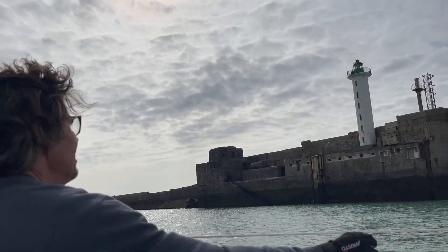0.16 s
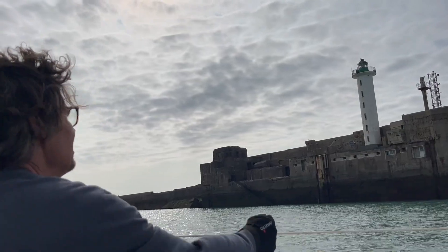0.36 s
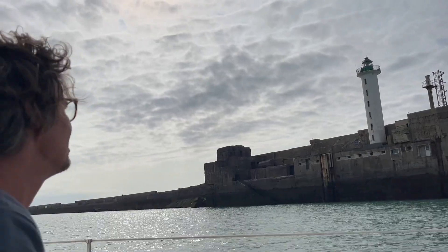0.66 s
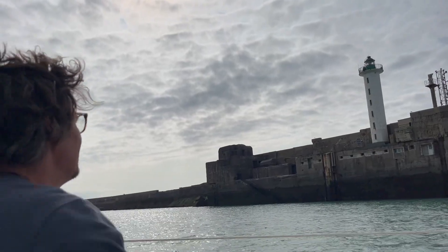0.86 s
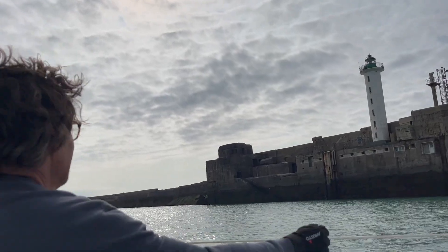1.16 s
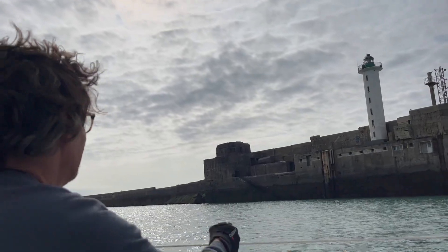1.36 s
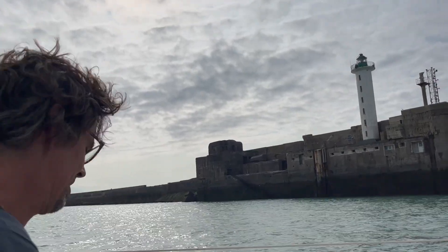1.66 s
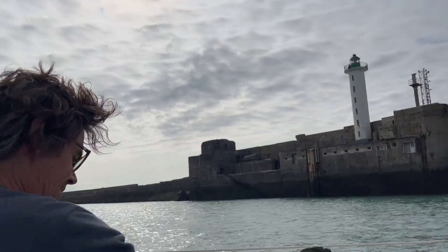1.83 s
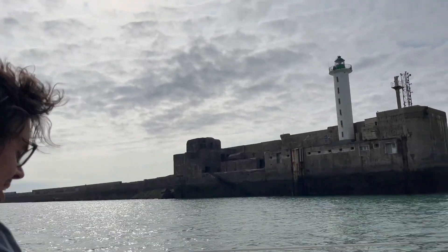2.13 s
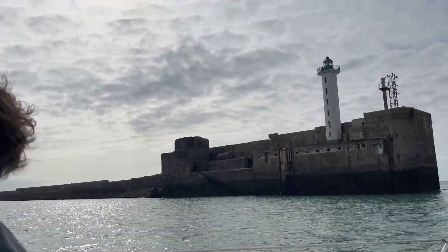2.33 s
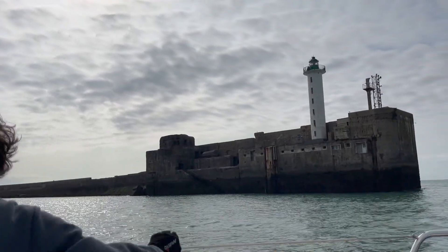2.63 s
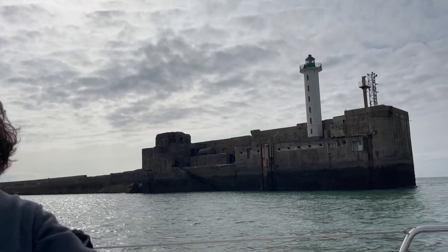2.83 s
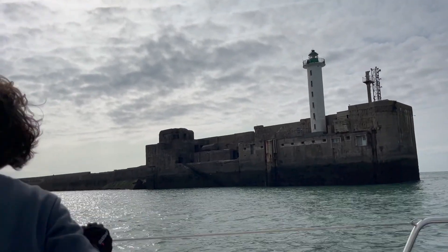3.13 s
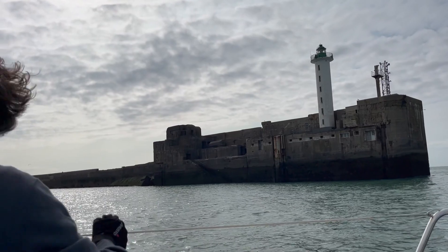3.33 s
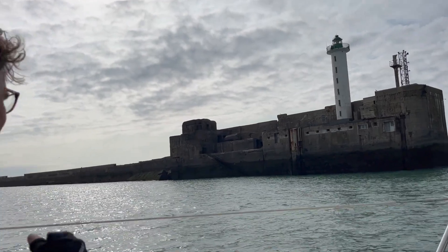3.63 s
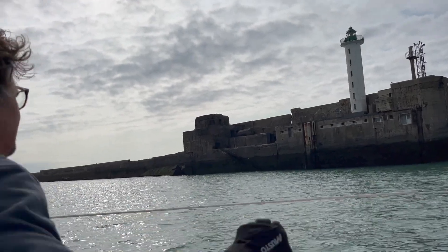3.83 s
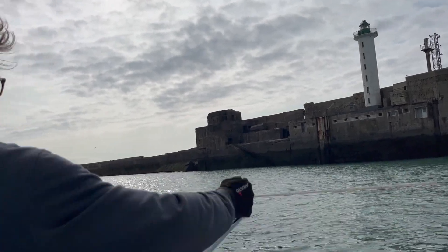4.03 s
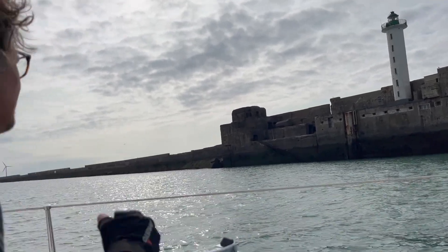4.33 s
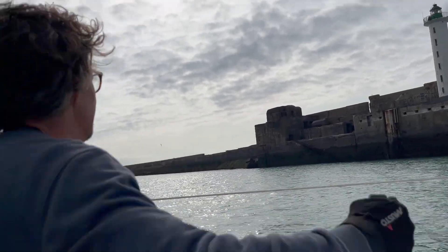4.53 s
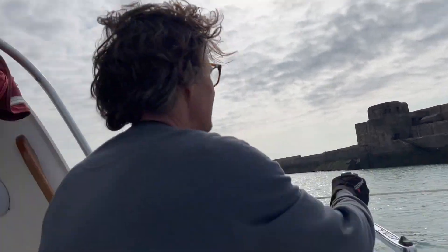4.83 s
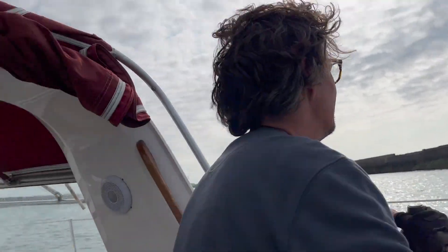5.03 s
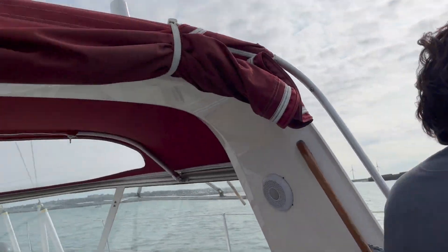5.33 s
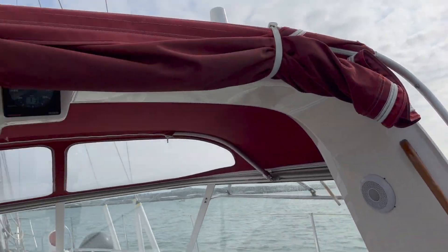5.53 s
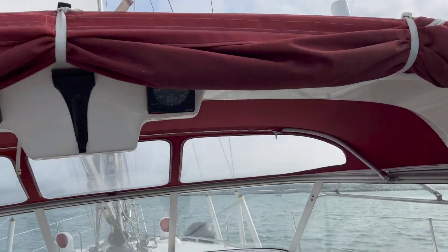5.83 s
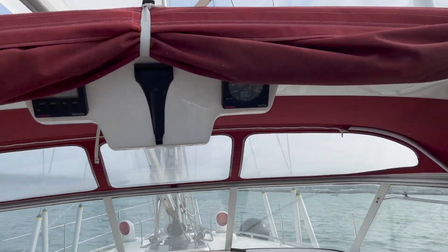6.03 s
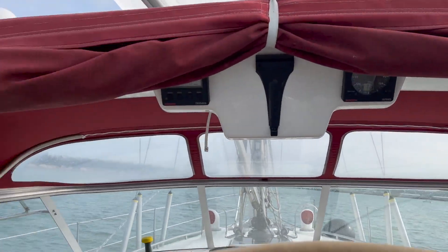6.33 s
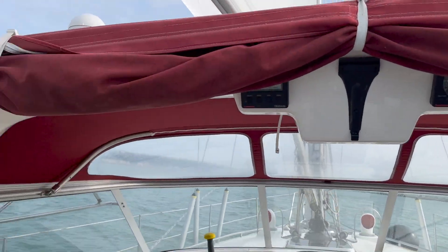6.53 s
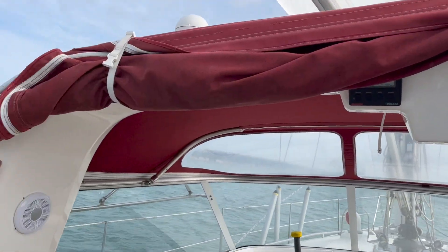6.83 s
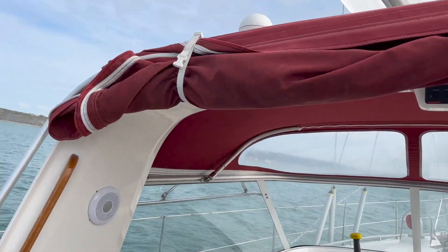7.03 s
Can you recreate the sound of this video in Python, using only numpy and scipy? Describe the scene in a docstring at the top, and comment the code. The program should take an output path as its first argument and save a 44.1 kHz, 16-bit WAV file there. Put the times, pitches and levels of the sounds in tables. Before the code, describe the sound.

Close steel ratchet clicking and gear grinding as a sailor cranks a winch, with buffeting wind, then the clatter grows fainter off to the side.

```python
"""Sheet winch in a yacht's cockpit

A sailor cranks a sheet winch at close range, pausing once; the microphone then turns away to the side.
Steel pawls are noise blows that excite ringing modes; filtered noise makes the grinding, chattering gears.
Resonant blows make knocks under load and single ticks; low decaying modes thud in the deck.
Shaped noise buffets the two microphone ports as wind, over a faint wash of water."""
import sys
import numpy as np
from scipy import signal
from scipy.fft import rfft, irfft, next_fast_len
from scipy.io import wavfile
from scipy.ndimage import uniform_filter1d

SR = 44100
rng = np.random.default_rng(int(sys.argv[2]) if len(sys.argv) > 2 else 0)


def waveform_to_disk(signal):
    """Save audio, clipped to [-1, 1], as 16-bit WAV at the path in sys.argv[1]."""
    frames = np.transpose(np.atleast_2d(signal))
    scaled = np.clip(frames, -1, 1) * 32767
    samples = np.round(scaled).astype(np.int16)
    wavfile.write(sys.argv[1], SR, samples)


N = 316682
T = np.arange(N) / SR
HIT = T[:SR // 14]  # time within one blow, s

# Levels in the tables are relative: each function adds its own trims.
# pushes of the handle: t/s, teeth, rate at start/(teeth/s), rate at end/(teeth/s),
# extra rate mid-push/(teeth/s), level/dB
STROKES = [(0.0116, 10, 32.18, 31.57, -5.63, -34.5), (0.3637, 14, 33.68, 37.9, 2.1, -34),
           (0.7575, 11, 20.94, 14.2, 8.85, -35.5), (1.2804, 18, 22.82, 42.24, 11.07, -36.5),
           (1.7553, 23, 34.52, 42.08, 8.98, -35), (2.2804, 11, 33.61, 28.49, -1.86, -36),
           (2.652, 5, 24.95, 17.26, 3.88, -34.5), (3.4745, 10, 29.94, 27.63, 3.27, -36.5),
           (3.8056, 13, 32.95, 50.38, 0.53, -34.5), (4.118, 11, 39.47, 31.85, 1.6, -34),
           (4.4362, 21, 28.84, 33.05, 9.6, -34), (5.0089, 10, 28.58, 32.87, -0.94, -39),
           (5.3327, 11, 37.61, 48.78, 5.39, -38.5)]
# cranking goes on off to the side: t/s, rate/(teeth/s), level/dB
TURNED_AWAY = [(5.57, 51, -42.5), (5.7, 35, -46.5), (5.9, 32.4, -50.5), (6.15, 33.6, -41.5),
               (6.6, 38, -48.5), (7.18, 54.4, -48.5)]
# grinding of the gear train: t/s, level/dB
GEARS = [(0, -46), (.6, -40), (.85, -46.5), (1.3, -48), (1.5, -37.5), (2.2, -43), (2.5, -51), (2.8, -47.5),
         (2.9, -60), (3.38, -66), (3.5, -42.5), (4.9, -41.5), (5.1, -48), (7.18, -50.5)]
# knocks of metal under load, and ticks of the second pawl that stand out singly: t/s, level/dB, f/Hz
KNOCKS_AND_TICKS = [(0.214, -29, 4270), (0.325, -27, 3750), (0.483, -26, 2880), (0.595, -25.5, 2770),
                    (.652, -29, 3350), (.676, -32, 3330), (0.756, -27, 3000), (.954, -35, 3550),
                    (0.99, -32, 3730), (1.027, -33.5, 3700), (1.064, -32.5, 3500), (1.105, -32.5, 3800),
                    (1.157, -21.5, 4000), (1.355, -32, 3570), (1.384, -31.5, 3440), (1.478, -22.5, 4700),
                    (1.74, -24.5, 2820), (1.923, -26.5, 4000), (2.143, -31.5, 3620), (2.604, -31.5, 3520),
                    (3.02, -27.5, 1274), (3.397, -34.5, 1470), (3.433, -39, 3600), (3.46, -40, 3420),
                    (3.495, -31, 2930), (3.873, -26, 2440), (4.021, -27, 2380), (4.169, -26.5, 4140),
                    (4.226, -31, 2700), (4.48, -30, 4440), (4.618, -25.5, 3060), (4.785, -22.5, 2580),
                    (4.927, -38.5, 4040), (5.008, -21.5, 5400), (5.778, -38, 2670), (6.084, -34.5, 2520),
                    (6.304, -36.5, 2570), (6.548, -38, 2500), (6.787, -39.5, 2601), (7.109, -37, 2740)]
# spectrum of knocks, rasp and gear chatter: f/Hz, density/(dB per Hz)
CLACK_COLOUR = [(400, -4.5), (1700, 11), (2700, 15), (5000, 5), (7000, 9.5), (9500, -1), (16000, -24)]
# spectrum of small eddies on the ports: f/Hz, density/(dB per Hz)
FLUTTER = [(50, -34), (150, -6), (330, -1), (500, 2.5), (800, -3), (1200, -15.5), (1900, -27), (5000, -90)]


def undb(db):
    """Decibels to gain."""
    return 10 ** (np.asarray(db) / 20)


def unit(x):
    """Scale to rms 1."""
    return x / np.sqrt(np.mean(x ** 2))


def strongest_rms(x, size):
    """Rms of the loudest stretch of size samples, both ports together."""
    power = np.atleast_2d(x).mean(0) ** 2
    return np.sqrt(uniform_filter1d(power, size, mode="constant").max())


def loudest(x, size):
    """Scale so that the loudest stretch of size samples has rms 1 in the mean of the ports."""
    return x / strongest_rms(x, size)


def smooth(x, size):
    """Running mean over size samples, taken twice."""
    return uniform_filter1d(uniform_filter1d(x, size), size)


def curves(table):
    """The columns of a table, joined by straight lines in time."""
    s, *columns = np.transpose(table)
    return [np.interp(T, s, column) for column in columns]


def colour(x, points):
    """Causal minimum-phase filter with the given spectrum, at unit power gain."""
    size = 4096
    hz, db = np.transpose(points)
    log_hz = np.log(np.fft.rfftfreq(size, 1 / SR) + 1)
    log_gain = np.log(undb(np.interp(log_hz, np.log(hz), db)))
    # folding the cepstrum forward in time makes the response causal
    cepstrum = irfft(log_gain)[:size // 2]
    cepstrum[1:] *= 2
    response = irfft(np.exp(rfft(cepstrum, size)))
    response /= np.linalg.norm(response)
    return signal.oaconvolve(x, response[None], axes=1)[:, :N]


def noise(count, side):
    """Stereo noise; side is the weight of what differs between the ports."""
    common, apart = rng.standard_normal((2, count))
    return np.array([common + side * apart, common - side * apart])


def add(out, s, x):
    """Mix x in at time s."""
    i = int(np.clip(s * SR, 0, N - 1))
    out[:, i:i + x.shape[-1]] += x[..., :N - i]


def resonate(x, hz, q):
    """One resonance of sharpness q."""
    return signal.lfilter(*signal.iirpeak(min(hz, .4 * SR), max(q, 1), fs=SR), x)


def knock(push, hz, q):
    """A blow with a pitch: two resonances in series, the second set to half the sharpness."""
    return loudest(resonate(resonate(push, hz, q), hz, q / 2), size=88)


def contact(rise_s, decay_s, tail_db, tail_s):
    """Envelope of a blow: brief chatter, then reflections in the cockpit."""
    fall = np.exp(-HIT / decay_s) + undb(tail_db) * np.exp(-HIT / tail_s)
    return (1 - np.exp(-HIT / rise_s)) * fall


def eddies(points, side, size):
    """Turbulence of even strength over spans of size samples, ragged within them."""
    x = colour(noise(N, side), points)
    return x / np.sqrt(smooth(np.mean(x ** 2, axis=0), size))


def puffs(breeze_db, rumble_db=-3, flutter_db=-8, half_s=0.018, count=24):
    """Lesser gusts come by chance, about three a second, with strengths scattered about the breeze."""
    times = (np.arange(count) + rng.random(count)) * T[-1] / count
    spread_db = 3
    sizes = np.interp(times, T, breeze_db) + spread_db * np.tanh(rng.standard_normal(count))
    return [(s, db + rumble_db, db + flutter_db, half_s) for s, db in zip(times, sizes)]


def wind(rumble_db=-0.38, flutter_db=-1.5, calm_flutter_db=-12, ragged_db=5.0, lean_db=1.5, spray_db=4):
    """Large eddies rumble on both ports, small ones flutter on each; a gust drives both at once."""
    # the air flowing over the microphone: t/s, rumble/dB
    breeze = [(0.0, -32.5), (1.3, -33), (1.7, -26.5), (2.44, -31), (2.95, -20.5), (3.15, -43.5),
              (3.45, -27), (3.9, -29), (4.1, -40.5), (4.5, -29), (4.75, -39.5), (5.1, -42.5), (5.7, -36.5),
              (6.1, -33.5), (6.6, -26.5), (7.18, -35)]
    # the strongest gusts: t/s, rumble/dB, flutter/dB, half length/s
    gusts = [(0.045, -16, -27, 0.015), (1.005, -22, -56, 0.023), (1.435, -20, -30, 0.044),
             (1.622, -15.5, -20, 0.0096), (1.742, -9.5, -25, 0.022), (1.854, -14.5, -30, 0.018),
             (2.104, -15.5, -27, 0.019), (2.203, -20, -23, 0.028), (2.296, -10, -20.5, 0.027),
             (2.522, -15.5, -22.5, 0.017), (2.597, -25, -23, 0.035), (2.711, -20.5, -27, 0.01),
             (2.8, -22, -25.5, 0.014), (2.841, -16, -20, 0.014), (2.946, -31, -26.5, 0.028),
             (3.231, -17.5, -18.5, 0.013), (3.276, -17.5, -22.5, 0.031), (3.724, -30, -27, 0.019),
             (3.84, -24, -29.5, .012), (3.921, -19.5, -23, 0.037), (4.327, -23, -27, 0.018),
             (4.597, -21.5, -22.5, .023), (5.249, -21.5, -41, 0.012), (5.408, -28.5, -39, 0.096),
             (5.795, -37, -34.5, 0.029), (6.019, -19, -32.5, 0.028), (6.47, -26, -25.5, 0.023),
             (7.072, -24, -26.5, 0.056)]
    # spectrum of large eddies: f/Hz, density/(dB per Hz)
    rumble_colour = [(20, -31), (45, -6.5), (72, 3), (130, -4.5), (300, -10.5), (450, -17), (1500, -76)]
    breeze_db, = curves(breeze)
    breeze_ragged_db = 3
    slow = unit(smooth(rng.standard_normal(N), 1300))
    quick = unit(smooth(rng.standard_normal(N), 420))
    # powers of the large and the small eddies
    low = undb(breeze_db + breeze_ragged_db * np.tanh(slow)) ** 2
    high = low * undb(calm_flutter_db) ** 2
    for s, low_db, high_db, half in gusts + puffs(breeze_db):
        near = np.abs(T - s) < 4 * half
        swell = np.exp(-((T[near] - s) / half) ** 2)
        low[near] += swell * undb(low_db) ** 2
        high[near] += swell * undb(high_db) ** 2
    rumble = eddies(rumble_colour, side=1 / 10, size=800) * np.sqrt(low)
    rumble *= undb(rumble_db + .5 * ragged_db * quick)
    flutter = eddies(FLUTTER, side=0.7, size=450) * np.sqrt(high)
    flutter *= undb(flutter_db + ragged_db * quick)
    # the hardest gusts tear into finer, higher eddies: these grow with power, not amplitude
    finer = [(1.19 * hz, db) for hz, db in FLUTTER]
    flutter += eddies(finer, side=0.36, size=450) * high * undb(spray_db + ragged_db * quick)
    # once the microphone has turned, the left port is to windward
    lean = lean_db + np.interp(T, [5.5, 6.1], [0, 2.5])
    return (rumble + flutter) * undb(np.array([lean, -lean]) / 2)


def water(level_db=-49):
    """The wash along the hull: coloured noise that swells slowly."""
    # spectrum of the wash: f/Hz, density/(dB per Hz)
    wash = [(100, -4), (700, -1), (2000, -22.5), (5000, -27), (16000, -60)]
    swell_db = np.interp(T, np.arange(32) / 4, rng.standard_normal(32))
    return unit(colour(noise(N, side=1.0), wash)) * undb(level_db + swell_db)


def gears(grind_db=-5.0, chatter_db=-8.0, grain_s=0.0039, whirr_db=7, housing_db=-51):
    """Bearings grind steadily; gear teeth tick at random moments as they change flanks."""
    # spectrum of the bearings: f/Hz, density/(dB per Hz)
    grind_colour = [(300, -6), (900, 14.5), (1900, 6), (3600, -0.5), (5200, -3.5), (6600, -14.5), (9000, 2),
                    (12500, -37)]
    # the winch housing heard from the side: f/Hz, density/(dB per Hz)
    housing_colour = [(900, -10.5), (1620, 8.5), (1850, -28), (2450, -30), (3300, 1.5), (12000, -36)]
    db, = curves(GEARS)
    rate, spread_db = 55, 4  # mean impacts per second; dB per unit of the random draw
    struck = rng.random(N) < rate / SR
    impacts = struck * undb(spread_db * np.minimum(rng.exponential(size=N), 2))
    envelope = signal.lfilter([1], [1, -np.exp(-1 / (grain_s * SR))], impacts)
    chatter = unit(colour(noise(N, side=0.2) * envelope, CLACK_COLOUR)) * undb(chatter_db)
    # from the side, more of the winch arrives as a diffuse whirr with the hollow note of its housing
    whirr = whirr_db * np.interp(T, [5.1, 6.1], [0, 1])
    grind = unit(colour(noise(N, side=0.54), grind_colour)) * undb(grind_db + whirr)
    housing = unit(colour(noise(N, side=1.0), housing_colour)) * undb(housing_db)
    housing *= np.interp(T, [4.8, 5.8], [0, 1])
    return (chatter + grind) * undb(db) + housing


def tooth_times(s, teeth, first, last, swell):
    """A push sweeps between two paces, with extra mid-push; gives tooth times and the pace between them."""
    along = np.linspace(0, 1, round(teeth) - 1)
    rate = first + (last - first) * along + swell * np.sin(np.pi * along)
    return s + np.r_[0, np.cumsum(1 / rate)], rate


def stroke_teeth(scatter_db=3.0):
    """One pawl drop for each tooth of each push."""
    drops = []
    for s, teeth, first, last, swell, db in STROKES:
        times, _ = tooth_times(s, teeth, first, last, swell)
        drops += zip(times, db + scatter_db * np.tanh(rng.standard_normal(len(times))))
    return drops


def later_teeth(uneven=0.15, scatter_db=2):
    """Off to the side, one drop for each tooth that passes, at the pace of the arm."""
    rate, db = curves(TURNED_AWAY)
    late, size = rng.standard_normal((N // 441, 2)).T
    started = T > TURNED_AWAY[0][0]
    teeth_passed = np.cumsum(rate * started) / SR
    drops = np.flatnonzero(np.diff(np.floor(teeth_passed)))
    return [(T[i] + uneven * a / rate[i], db[i] + scatter_db * b) for i, a, b in zip(drops, late, size)]


def ring(push, dull_db, lift_db, bloom_s=.0009):
    """Steel modes swell briefly, then decay; every blow detunes them and shares out their levels anew."""
    # the steel pawl, ratchet and housing: f/Hz, level/dB, t60/s
    steel = [(1560, -11, .025), (2450, -7, .012), (2800, -7.5, .012), (3540, -7, .03), (3630, -1, 0.045),
             (4030, -4, 0.02), (4680, -10, .01), (5450, -13, .01), (7772, 3.5, 0.032), (8300, -13, 0.01),
             (8740, -2, 0.02), (8850, -2, 0.018), (9170, -10, .012), (14440, -12, 0.018),
             (15282, -11, 0.014)]
    out, main = 0, 0
    spread_db, detune = 4.8, .0028  # scatter of level; scatter of pitch as a fraction
    corner_hz = 2600  # above it, dull_db is lost per octave
    for (hz, db, t60), (a, b) in zip(steel, rng.standard_normal((len(steel), 2))):
        turn = 2 * np.pi * hz * (1 + detune * a) / SR
        ring_keep = np.exp(-np.log(1000) / (t60 * SR))
        bloom_keep = np.exp(-1 / (min(bloom_s, t60 / 20) * SR))
        mode = push
        for keep in ring_keep, bloom_keep:
            mode = signal.lfilter([1], [1, -2 * keep * np.cos(turn), keep ** 2], mode)
        loss_db = dull_db * max(np.log2(hz / corner_hz), 0)
        mode = undb(db + spread_db * b - loss_db) * unit(mode)
        out = out + mode
        main = main + mode * (7000 < hz < 8200 or hz > 14000)  # main ring and its overtones
    strongest = np.sqrt(uniform_filter1d(np.mean(out ** 2, axis=0), size=529, mode="constant").max())
    return (out + (undb(lift_db) - 1) * main) / strongest


def cockpit(x, tail_s=0.025, wet_db=-5):
    """As the microphone turns away, the cockpit walls blend the ringing into a sizzle."""
    turned = np.interp(T, [5.5, 5.8], [0, 1])
    walls = rng.standard_normal(len(HIT)) * np.exp(-HIT / tail_s) * (1 - HIT / HIT[-1])
    spectrum = rfft(walls, 2 * len(HIT))
    walls = irfft(spectrum / np.abs(spectrum))[:len(HIT)]  # many reflections, favouring no pitch
    echo = signal.oaconvolve(x, walls[None], axes=1)[:, :N]
    wet = turned * undb(wet_db)
    return (x + echo * wet) / np.hypot(1, wet)


def ratchet(tick_db=-5.5, tick_spread_db=4.5, ring_db=0, bounce=0.44):
    """Each pawl snaps down, bounces a few milliseconds later and sets the steel ringing."""
    # as the microphone turns, the cockpit favours the main ring near 8 kHz and its overtones: t/s, lift/dB
    facing = [(5.2, 0.5), (5.34, 14.5), (5.55, 1), (6.8, 4)]
    # spectrum of the snap: f/Hz, density/(dB per Hz)
    tick_colour = [(400, 11.5), (1000, 15.5), (1900, 11), (2700, -8), (4800, -2.5), (6700, 6), (9200, 5.5),
                   (11500, 2), (15300, 1), (16200, -44)]
    snaps, rings = np.zeros((2, 2, N))
    blow = contact(rise_s=0.00049, decay_s=0.0025, tail_db=-18.0, tail_s=0.007)
    bounce_s = .003, .011  # earliest and latest
    for s, db in stroke_teeth() + later_teeth():
        rebound = np.interp(HIT - rng.uniform(*bounce_s), HIT, blow, left=0)
        envelope = blow + bounce * rng.random() * rebound
        push = loudest(noise(len(HIT), side=0.59) * envelope, size=529)
        snap_db = tick_db + tick_spread_db * np.tanh(rng.standard_normal())
        add(snaps, s, push * undb(db + snap_db))
        dull_db = np.interp(s, [5.6, 6.05], [.5, 2.2])  # the ring is duller from the side
        lift_db = np.interp(s, *np.transpose(facing))
        narrowed = (push + push.mean(0)) / 2
        add(rings, s, undb(db + ring_db) * ring(narrowed, dull_db, lift_db))
    return colour(snaps, tick_colour) + cockpit(rings)


def second_pawl(level_db=4.0, gearing=0.95, scatter_db=5, decay_s=0.00059, pitch_hz=3700, pitched_db=-3):
    """A second pawl, deeper in the gears, ticks dry with random pitch, harder the more the gears grind."""
    # spectrum of the second pawl: f/Hz, density/(dB per Hz)
    dry_tick = [(600, -3), (2300, 0.5), (5500, -5), (8000, 5), (11000, -12), (16000, 0)]
    broad, pitched = np.zeros((2, 2, N))
    blow = contact(rise_s=0.00043, decay_s=decay_s, tail_db=-22.5, tail_s=0.0054)
    spread_octaves, q, clear_s = .6, 2.5, .02
    drops = [s for s, _ in later_teeth(uneven=0.45)]
    for s, teeth, first, last, swell, _ in STROKES:
        times, rate = tooth_times(s, teeth, first, last, swell)
        # during a push it ticks gearing times for each tooth of the first pawl
        places = np.arange(rng.random(), len(rate), 1 / gearing)
        drops += list(np.interp(places, np.arange(len(times)), times))
    for s in drops:
        grind_db = np.interp(s, *np.transpose(GEARS))
        gain = undb(grind_db + level_db + scatter_db * np.tanh(rng.standard_normal()))
        # near a listed knock or tick it stays silent
        gain *= min(abs(s - listed[0]) for listed in KNOCKS_AND_TICKS) > clear_s
        tick = loudest(noise(len(HIT), side=0.31) * blow, size=88)
        hz = pitch_hz * 2 ** (spread_octaves * rng.uniform(-0.7, 1))
        add(broad, s, gain * tick)
        add(pitched, s, gain * undb(pitched_db) * knock(tick, hz, q))
    return colour(broad, dry_tick) + pitched


def knocks_and_ticks(level_db=0, broad_db=-5, q=1.45, rasp_db=-20, turned_rasp_db=13, rasp_s=0.082):
    """Knocks of metal under load and single second-pawl ticks, each with its own pitch and a brief rasp."""
    knocks, rasps, rings = np.zeros((3, 2, N))
    blow = contact(rise_s=0.0004, decay_s=0.0011, tail_db=-9, tail_s=0.005)
    for s, db, hz in KNOCKS_AND_TICKS:
        push = loudest(noise(len(HIT), side=0.26) * blow, size=88)
        edge = min(hz / 2600, 1) ** 4  # low knocks are softer edged
        add(knocks, s, undb(db + broad_db) * edge * push)
        add(rings, s, undb(db + level_db) * knock(push, hz, q / np.sqrt(edge)))
        # from the side, more of the rasp arrives by way of the cockpit walls
        side_db = turned_rasp_db * (s > TURNED_AWAY[0][0])
        fade = np.exp(-HIT / rasp_s) * (1 - HIT / HIT[-1])
        rasp = noise(len(HIT), side=0.61) * fade * edge
        add(rasps, s, undb(db + rasp_db + side_db) * rasp)
    return colour(knocks + rasps, CLACK_COLOUR) + rings


def thuds(rise_s=0.0014, sag=1.6, level_db=-1.5, rough=0.17):
    """The deck under the winch gives a few low cycles of its modes, sagging in pitch, with a woody rattle."""
    # dull thuds in the deck: t/s, level/dB, f/Hz at the start
    thud_events = [(0.603, -20, 319), (.763, -19, 332), (1.163, -16.5, 295), (2.357, -25.5, 640)]
    # the deck's panel modes: multiple of the pitch, level/dB, decay/s
    deck = [(.72, -9, 0.0086), (1, 0, 0.01), (1.36, -4, 0.0034), (2.1, -16.5, 0.0048)]
    out = np.zeros((2, N))
    for s, db, hz in thud_events:
        phase = 2 * np.pi * np.cumsum(hz * np.exp(-sag * HIT)) / SR
        swing = sum(undb(mode_db) * np.sin(k * phase) * np.exp(-HIT / decay) for k, mode_db, decay in deck)
        band = signal.butter(2, [hz / 2, 2 * hz], "bandpass", fs=SR, output="sos")
        rattle = unit(signal.sosfilt(band, rng.standard_normal(len(HIT))))
        swing = swing + rough * rattle * np.exp(-HIT / deck[0][2])
        thud = loudest(swing * (1 - np.exp(-HIT / rise_s)), size=441)
        add(out, s, undb(db + level_db) * thud)
    return out


def pings(hz=3625, level_db=-1, rise_s=0.00067, decay_s=0.0069):
    """The lowest mode of the ratchet ring, sounding almost alone: a decaying sine."""
    # now and then a pawl lands squarely and the ratchet ring pings: t/s, level/dB
    ping_events = [(.61, -26), (.763, -32), (1.643, -32), (1.784, -32), (1.934, -33.5), (2.343, -39),
                   (4.078, -30), (4.362, -34), (4.434, -30), (4.645, -27.5), (5.358, -34.5), (5.91, -37),
                   (6.055, -34.5), (6.18, -37), (6.346, -38.5), (6.55, -35), (6.93, -36.5)]
    out = np.zeros((2, N))
    detune = .004  # scatter of pitch as a fraction
    for (s, db), a in zip(ping_events, rng.standard_normal(len(ping_events))):
        tone = np.sin(2 * np.pi * hz * (1 + detune * a) * HIT)
        tone = tone * (1 - np.exp(-HIT / rise_s)) * np.exp(-HIT / decay_s)
        add(out, s, undb(db + level_db) * loudest(tone, size=220))
    return out


def slaps(level_db=0, sag=0.4096, rough=0.19, lean_db=4.0):
    """A small eddy hits the ports: a few swings of pressure that slow as it leaves, stronger on the left."""
    # small eddies that slap the ports abruptly: t/s of the peak, peak/dB, f/Hz at the peak, length/s
    slap_events = [(1.444, -9, 368, 0.0063), (1.489, -7.5, 433, 0.0031), (2.291, -4.5, 484, 0.0012),
                   (2.5196, -12, 562, 0.0028), (2.7002, -7.5, 692, 0.0013), (2.838, -7, 478, 0.0033),
                   (2.8708, -10.5, 687, 0.002), (3.222, -13, 749, 0.0044), (3.2326, -10, 876, 0.00066),
                   (4.2945, -16, 600, 0.0042), (4.4994, -18.5, 461, .0065), (4.5944, -14.5, 688, 0.0029),
                   (5.246, -24.5, 379, 0.0049), (5.403, -16.5, 449, 0.0045), (6.286, -15, 486, 0.0049)]
    out = np.zeros((2, N))
    air = eddies(FLUTTER, side=0.78, size=200)
    lead_s = .015  # time before the peak
    for (s, db, hz, length), start in zip(slap_events, rng.random(len(slap_events))):
        along = 2 * (HIT - lead_s) / length
        envelope = np.where(along < 0, .5 ** (along ** 2), 1 / (1 + along ** 2))
        cycles = np.cumsum(hz * np.exp(-sag * np.tanh(along / 2))) / SR
        swing = np.sin(2 * np.pi * (start + cycles))
        ragged = swing + rough * np.roll(air, -int(s * SR), axis=1)[:, :len(HIT)]
        add(out, s - lead_s, undb(db + level_db) * envelope * ragged)
    return out * undb(np.array([[lean_db], [-lean_db]]) / 2)


def at_ports(x):
    """The ports hear the winch by different paths: their phases differ, the left well behind in the treble."""
    # phase between the ports: f/Hz, left lead/rad
    ports = [(1500, -.5), (3600, 1.5), (5200, -0.46), (8300, -6), (10400, -9), (15300, -12.5)]
    hz, lead = np.transpose(ports)
    size = next_fast_len(N + 2048)
    turn = np.interp(np.fft.rfftfreq(size, 1 / SR), hz, lead)
    return irfft(rfft(x, size) * np.exp(.5j * np.array([turn, -turn])), size)[:, :N]


def scene():
    """Wind, water, deck and winch."""
    winch = gears() + ratchet() + second_pawl() + knocks_and_ticks() + cockpit(pings())
    return wind() + water() + at_ports(winch) + thuds() + slaps()


def record(dry):
    """The recorder rounds the highest peaks and cuts the top."""
    top_hz = 15800
    rounded = np.tanh(dry / .97) * .97
    return signal.sosfilt(signal.ellip(8, .2, 70, top_hz, fs=SR, output="sos"), rounded)


dry = scene()
out = record(dry)
waveform_to_disk(out)
```